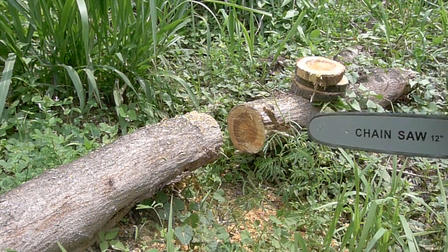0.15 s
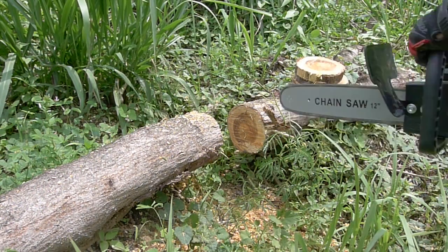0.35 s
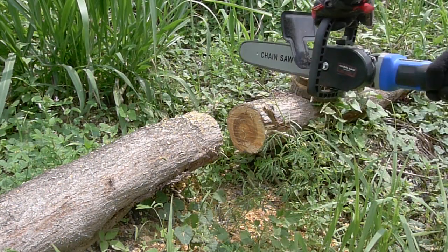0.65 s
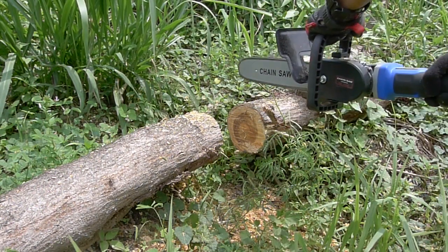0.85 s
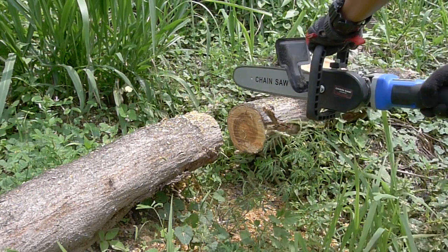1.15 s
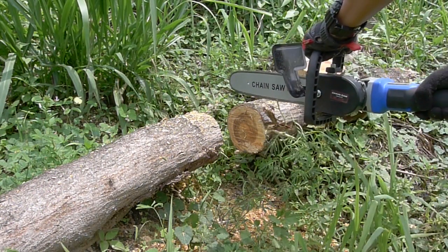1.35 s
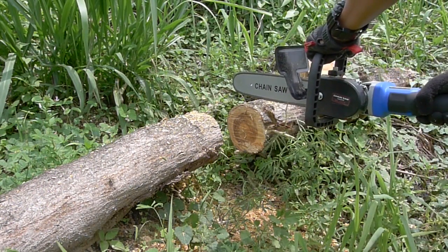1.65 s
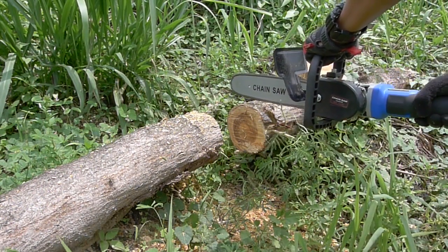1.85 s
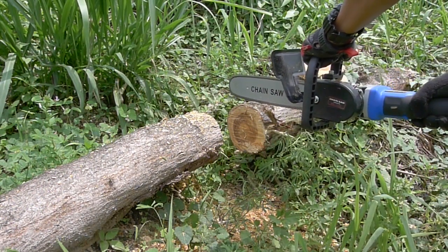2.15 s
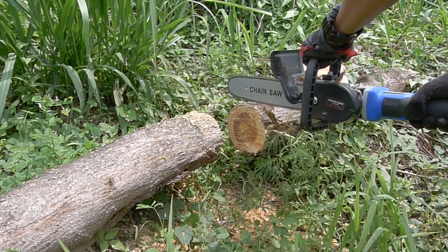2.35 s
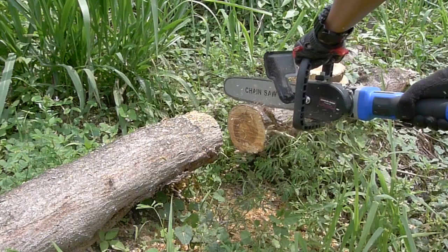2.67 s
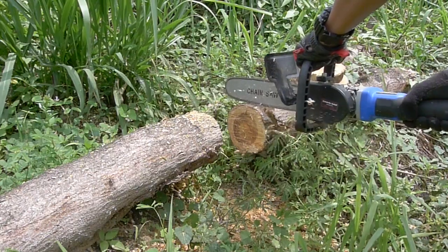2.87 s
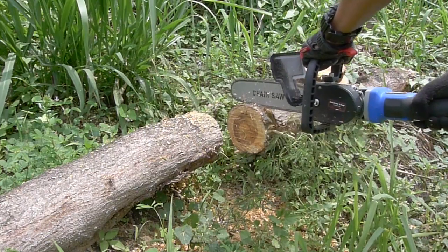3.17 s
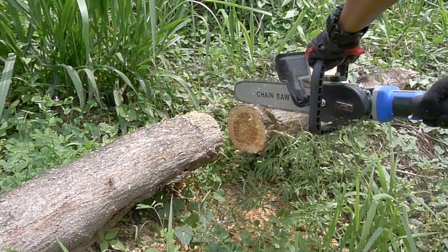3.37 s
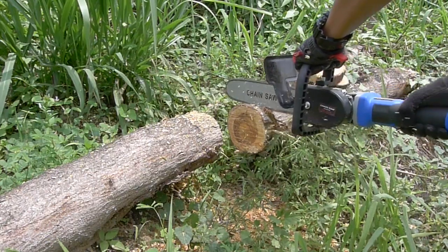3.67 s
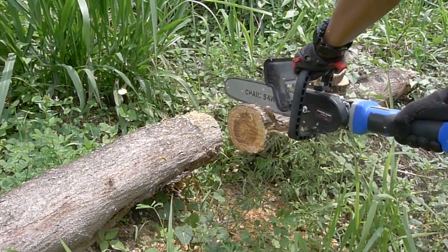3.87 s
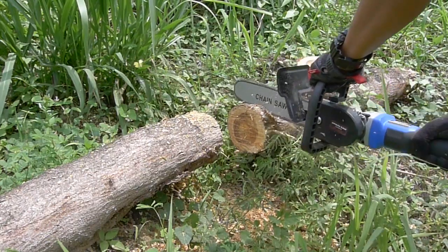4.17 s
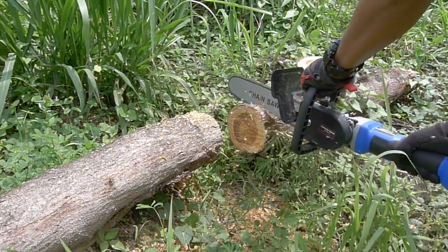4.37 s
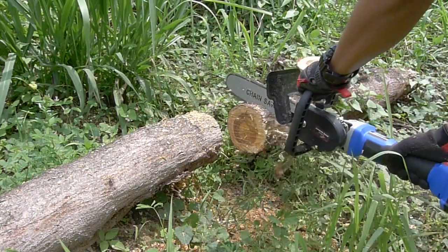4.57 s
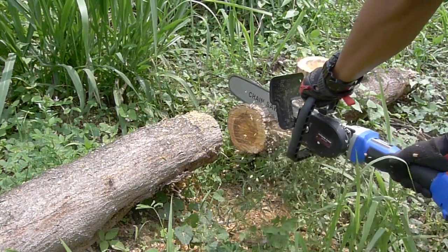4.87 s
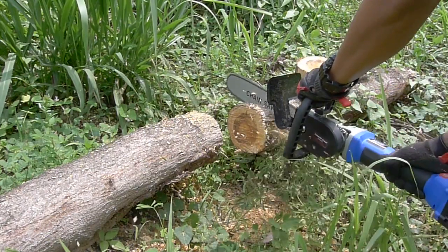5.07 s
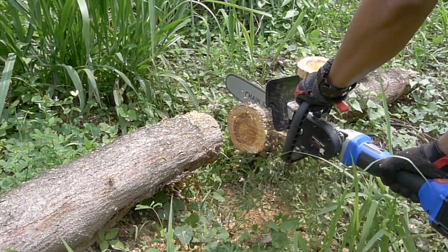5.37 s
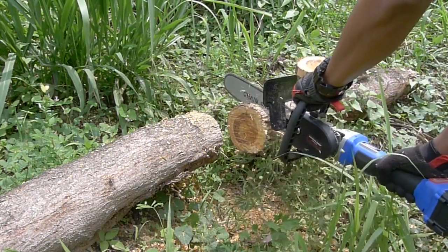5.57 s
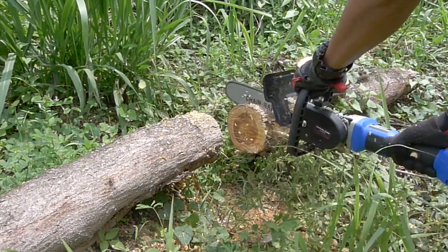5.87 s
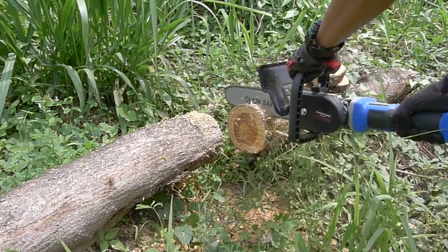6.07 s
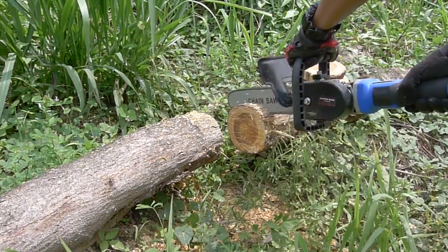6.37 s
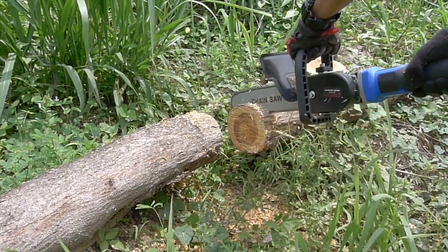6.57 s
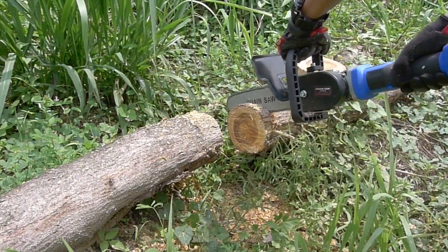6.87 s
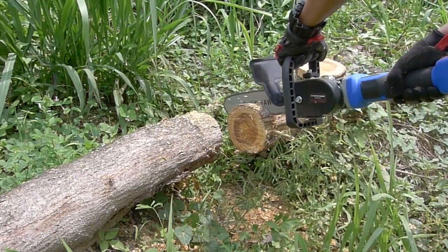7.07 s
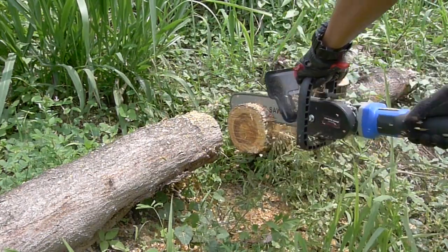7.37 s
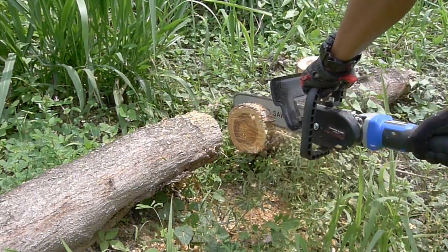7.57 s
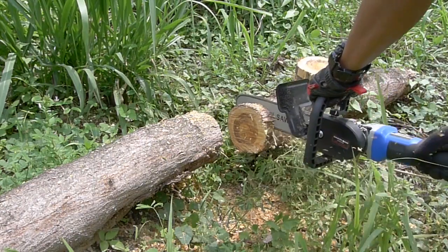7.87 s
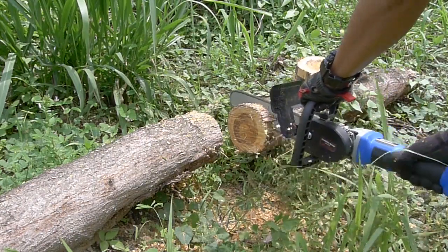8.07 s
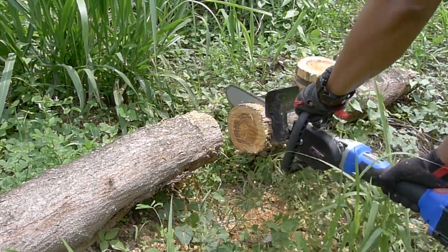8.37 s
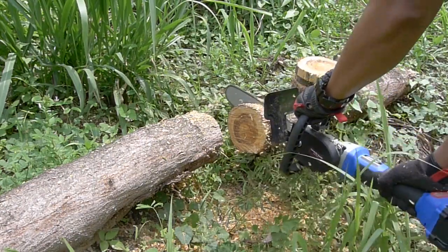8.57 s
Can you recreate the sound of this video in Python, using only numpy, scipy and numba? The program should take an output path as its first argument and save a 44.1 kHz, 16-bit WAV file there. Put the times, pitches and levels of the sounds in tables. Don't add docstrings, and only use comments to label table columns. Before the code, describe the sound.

A small electric chain saw accelerates from a low whirr, clattering loosely, then runs free with a bright metallic hiss. It meets a log and loads down: a piercing high gear whine swells in spells, broken by rapid uneven knocks and rattling metal. Near seven seconds it sags, nearly choked, then picks up again. Mono, fairly close, open air, the saw covering a faint outdoor floor.

```python
import sys
import numpy as np
from scipy import signal
from scipy.fft import rfft, irfft, next_fast_len
from scipy.io import wavfile
from scipy.ndimage import uniform_filter1d
from numba import njit

SR = 44100
rng = np.random.default_rng(int(sys.argv[2]) if len(sys.argv) > 2 else 0)


def generate_wav(signal):
    frames = np.transpose(np.atleast_2d(signal))
    scaled = np.clip(frames, -1, 1) * 32767
    pcm = np.round(scaled).astype(np.int16)
    wavfile.write(sys.argv[1], SR, pcm)


def volts_from_db(level):
    exponent = np.asarray(level, float) / 20
    return 10 ** exponent


N = 384552
TIME = np.arange(N) / SR
TEETH, LINKS_PER_GEAR_CYCLE = 6, .5105
FREE_FROM_S, FREE_FULL_S, LOAD_FROM_S, LOAD_FULL_S = 1.1, 1.7, 2.25, 2.45
BITE_S = 2.3
TOP_HZ = 15730

# time_s, gear_hz
CUT_SPEED = [(2.46, 1349), (2.68, 1267), (3.12, 1245), (3.36, 1277), (3.9, 1152), (4.4, 1217), (4.75, 1155),
             (5.45, 1208), (5.9, 1107), (6.52, 1110), (6.8, 1159), (7.08, 1037), (7.22, 1059), (7.46, 1024),
             (7.76, 1170), (7.97, 1198), (8.341, 1086), (8.72, 1139)]


def speed():
    free_hz, inertia_s = 1522.7, .07
    ramp_hz = np.minimum(519.4 + 670 * TIME - 40 * TIME ** 2, free_hz)
    held_hz = columns([(BITE_S, free_hz)] + CUT_SPEED)[0]
    gear_hz = np.where(TIME < BITE_S, ramp_hz, held_hz)
    return uniform_filter1d(gear_hz, int(inertia_s * SR), mode="nearest")


# first_s, last_s, bounces_count, swell_db
CHATTER = [(0.034, 0.196, 9, 0.5), (0.232, 0.284, 2, 1), (0.314, 0.496, 9, 1.3), (0.592, 1.15, 16, 0.2),
           (1.221, 1.659, 14, 0.35), (1.774, 2.03, 12, 0.5), (2.198, 2.519, 9, 1.4), (2.57, 2.707, 5, 2),
           (2.751, 2.864, 4, 2.5), (2.894, 2.978, 4, 2.3), (3.021, 3.129, 5, 2), (3.15, 3.356, 8, 1.65),
           (3.406, 3.492, 4, 1.7), (3.524, 3.625, 5, 2.5), (3.69, 3.835, 6, 1.85), (3.856, 4.092, 9, 2),
           (4.125, 4.515, 15, 1.66), (4.547, 4.596, 3, 1.5), (4.626, 4.854, 11, 1.35),
           (4.876, 5.077, 8, 2.0), (5.105, 5.359, 11, 2.5), (5.395, 5.637, 10, 2), (5.664, 5.99, 13, 1.5),
           (6.01, 6.588, 23, 1.56), (6.609, 7.092, 19, 1.3), (7.166, 7.424, 12, 1.1), (7.491, 7.569, 5, 2),
           (7.712, 7.989, 13, 2.13), (8.018, 8.24, 10, 1.65), (8.326, 8.694, 15, 1.4)]


def knocks():
    gain, scatter, jitter_s = 1.33, 0.33, 0.0013
    runs = [(s, db) for first, last, count, db in CHATTER for s in np.linspace(first, last, int(round(count)))]
    s, db = np.transpose(runs)
    early_late, soft_hard = rng.standard_normal((len(s), 2)).T
    at = ((s + jitter_s * early_late) * SR).astype(int)
    train = np.zeros(N)
    train[np.clip(at, 0, N - 1)] = gain * db * (1 + scatter * soft_hard)
    return train


# start_s, length_s, rise_s, level_db
SQUEALS = [
    (2.42, 1.23, .06, -30),
    (3.78, 0.22, .1, -38),
    (4.073, 0.63, .2, -36.5),
    (4.9, 0.35, .2, -43),
    (5.95, 0.33, .1, -39),
    (6.653, 0.16, 0.24, -30),
    (7.17, 0.17, .1, -46),
    (7.632, 0.51, 0.22, -33.5),
    (8.35, .5, .3, -39),
]


def squeal():
    spells = sum(volts_from_db(db) * spell(s, length, rise, min(0.29, length / 2)) for s, length, rise, db in SQUEALS)
    return volts_from_db(-47.5) + spells


# pitch_hz, level_db
LINK_TONE = [(264, -76), (390, -56), (500, -51.5), (575, -47.5), (610, -54), (660, -56), (720, -56),
             (775, -47)]
GEAR_TONE = [(517, -45), (640, -44.5), (764, -57), (1014, -46), (1120, -46), (1200, -55), (1330, -57),
             (1520, -49)]
MESH_TONE = [(1000, -25), (2050, -24), (2400, -9), (2600, -1), (2850, -4), (3150, -17), (3700, -27),
             (4300, -63)]
# multiple, level_db
SPROCKET = [(1, -77), (2, -79), (4, -60.5)]


def whine(gear_hz, turns, train):
    load = np.interp(TIME, (LOAD_FROM_S, LOAD_FULL_S), (.2, 1))
    slowing_hz = 11.2 * bounces(train, 0.0053, 0.012)
    wobble = turns + load * (.018 * walk(60) + .04 * walk(18) - np.cumsum(slowing_hz) / SR)
    choke = volts_from_db(load * (1.1 * walk(35) - 2.6 * bounces(train, .004, .008)))

    link = volts_from_db(along(LINKS_PER_GEAR_CYCLE * gear_hz, LINK_TONE) + 1.3 * walk(6) - 5 * (1 - load))
    gear = volts_from_db(along(gear_hz, GEAR_TONE) + 1.2 * walk(6) - 1.9 * (0.5 - load))
    second = volts_from_db(-28.5 + along(2 * gear_hz, MESH_TONE))
    fourth = volts_from_db(-22.5 + along(4 * gear_hz, MESH_TONE))
    fifth = volts_from_db(-31.5 + along(5 * gear_hz, MESH_TONE))
    torque = 0.13 + spell(0, 1.37, .01, .1)
    second = np.where(TIME < BITE_S, second * torque, squeal())

    sizes = link, gear, second, fourth, fifth
    orders = (1, *np.array([1, 2, 4, 5]) / LINKS_PER_GEAR_CYCLE)
    tones = sum(size * np.sin(2 * np.pi * k * wobble) for k, size in zip(orders, sizes))
    free = np.interp(TIME, (FREE_FROM_S, FREE_FULL_S, LOAD_FROM_S, LOAD_FULL_S), (0, 1, 1, 0))
    shaft = sum(volts_from_db(db) * np.sin(2 * np.pi * k * turns / TEETH) for k, db in SPROCKET)
    return np.sqrt(2) * (volts_from_db(0.5) * choke * tones + free * shaft)


def links(turns, scatter_db, slip):
    at = np.flatnonzero(np.diff(np.floor(turns)))
    early_late, soft_hard = rng.standard_normal((len(at), 2)).T
    at_slipped = at + (slip * early_late * np.gradient(at)).astype(int)
    clicks = np.zeros(N)
    clicks[np.clip(at_slipped, 0, N - 1)] = volts_from_db(scatter_db * soft_hard)
    return level(clicks - clicks.mean())


def friction(turns):
    clicks = links(turns, scatter_db=2.0, slip=.22)
    once_a_turn = 1 + 0.15 * np.sin(2 * np.pi * turns / TEETH)
    loose_db = np.interp(TIME, (LOAD_FROM_S, LOAD_FULL_S), (2.2, .9))
    ticks = walk(90)
    slap = volts_from_db(loose_db * (ticks - uniform_filter1d(ticks, SR // 40))) * once_a_turn

    def rub(swell_db, click_db):
        return slap * volts_from_db(swell_db) * (rng.standard_normal(N) + volts_from_db(click_db) * clicks)
    return rub


# pitch_hz, level_db
HISS = [(710, -52), (1200, -10.5), (2010, -8), (2520, -2.5), (3220, -5.5), (4220, -7), (5290, -10.5),
        (6080, -8.5), (7700, -12), (9860, -12), (15600, -14)]
# pitch_hz, width_hz, level_db
PLATES = [(7840, 480, 9), (9800, 890, 9.5), (6000, 230, -36.5)]


def sliding(rub, jolt):
    hiss = volts_from_db(1.0) * colour(rub(1.42 * jolt, -11.5), HISS)
    plates = volts_from_db(-10.0 + 1.4 * walk(2.95)) * ring(rub(1.3 * jolt, -15), PLATES)
    return hiss + plates


def drive_bands(rub, jolt, links_hz, depth):
    cutting_db = np.interp(TIME, (BITE_S, BITE_S + .3), (-28, 0))
    drag = rub(1.0 * jolt, -40)
    upper = volts_from_db(buried(depth, -12.5, -5.5) + cutting_db) * smear(drag, 6.95 * links_hz, 900.)
    pair = smear(drag, 3.92 * links_hz, 140.) + volts_from_db(-6) * smear(drag, 4.9 * links_hz, 250.)
    lower = volts_from_db(-14.5 + cutting_db) * pair
    ridge = volts_from_db(-13) * spell(7.33, 0.4, .15, .08) * smear(drag, 6.85 * links_hz, 220.)
    blades_per_gear_cycle = 13.2
    fan_hz = np.minimum(blades_per_gear_cycle / LINKS_PER_GEAR_CYCLE * links_hz, TOP_HZ)
    fan = volts_from_db(-9.5) * spell(-1, 1.45, .1, 0.18) * smear(drag, fan_hz, 2600.0)
    return fan + upper + ridge + lower


# pitch_hz, width_hz, level_db
BLADE = [(7300, 120, 3), (4200, 60, -8), (5980, 35, -2), (7940, 30, -8), (6130, 60, -4), (9230, 60, -9),
         (9980, 40, -9), (10470, 50, -10)]


def blade_face(rub, jolt, face_db):
    return volts_from_db(-10.5 + face_db + 2.0 * walk(7)) * ring(rub(0.54 * jolt, -13), BLADE)


# pitch_hz, width_hz, level_db
HOUSING = [(2412, 99, 7.5), (2776, 320, 6.5), (3040, 230, -0.5), (3400, 44, -6.5), (2230, 210, -31)]


def housing_rattle(rub, jolt, depth):
    housing_db = buried(depth, -4.5, -8.5) - squeal() / volts_from_db(-27)
    return volts_from_db(housing_db) * ring(rub(1.3 * jolt, -10.0), HOUSING)


# pitch_hz, width_hz, level_db
COVER = [(1596, 100, 0), (980, 120, -4)]


def cover_slap(rub, thud):
    slack = np.interp(TIME, (0, 0.27, 0.4, 1.5), (.45, 0.82, 0.47, 0.018))
    return volts_from_db(-4.5) * slack * ring(rub(2.6 * thud, -6), COVER)


# pitch_hz, width_hz, level_db
BAR = [(622.4, 82, 1), (1103, 178, -0.5), (778, 223, -1.5), (1486, 440, -3.5), (1837, 225, 0.5)]


def bar_knock(rub, thud, depth):
    return volts_from_db(buried(depth, -13.5, -7.5)) * ring(rub(3.6 * thud, -9.5), BAR)


# pitch_hz, width_hz, level_db
LOG = [(216.7, 14, 0.5), (303, 73, 1), (157, 35, -1.5)]


def log_knock(rub, thud, depth):
    body = ring(rub(3.1 * thud, -13.0), LOG)
    return volts_from_db(buried(depth, -40, -22)) * ring(body, [(260, 220, 0)])


# time_s, chain_hiss_db, body_coupling_0_to_1 (high at the starting jerk, then depth in the
# wood), face_to_camera_db
HOLD = [(0, -28.5, 0.63, 3.5), (.7, -27, 0.03, 0), (1.4, -28.5, 0.06, 1), (2.3, -28.5, .2, 3.5),
        (2.9, -28.5, 0.63, -3.5), (3.9, -29.5, 0.68, 3.5), (4.5, -30, 0.83, -3), (5.3, -29.5, 0.81, -1.5),
        (6.6, -28.5, 0.81, 2), (7.1, -28.5, 0.92, 0.5), (7.5, -28, 0.93, 0.5), (7.9, -29, .8, -3),
        (8.72, -27, .9, 3)]


def chain(links_hz, turns, train):
    hiss_db, depth, face_db = columns(HOLD)
    rub = friction(turns)
    jolt = bounces(train, .004, 0)
    thud = 3 * np.tanh(bounces(train, .0035, -.001) / 3)
    metal = sliding(rub, jolt) + drive_bands(rub, jolt, links_hz, depth)
    metal += blade_face(rub, jolt, face_db) + housing_rattle(rub, jolt, depth)
    blows = cover_slap(rub, thud) + bar_knock(rub, thud, depth) + log_knock(rub, thud, depth)
    return volts_from_db(hiss_db) * (metal + blows)


# pitch_hz, level_db
FIELD = [(15, -48), (25, -18), (70, -13), (144, -18), (188, -19), (349, -17), (450, -4), (580, -30),
         (990, -120)]


def field():
    breeze = colour(rng.standard_normal(N), [(20, -7), (45, -8), (95, -1.5), (140, -16), (300, -50)])
    lull_db = np.interp(TIME, (1.1, 2.0, 2.6), (0, -7, 0))
    first_gust = volts_from_db(-67) * np.exp(-(TIME / .9) ** 2)
    gusts = volts_from_db(1.2 * walk(2.9)) * (volts_from_db(-72.5 + lull_db) + first_gust)
    return volts_from_db(-73) * colour(rng.standard_normal(N), FIELD) + gusts * breeze


def bounces(train, width_s, late_s):
    t = TIME[:SR // 10] - .05 - late_s
    shape = np.exp(-.5 * (t / width_s / np.where(t < 0, .7, 1.3)) ** 2)
    swell = signal.fftconvolve(train, shape, "same")
    return swell - uniform_filter1d(swell, SR // 5)


def buried(depth, clear_db, buried_db):
    return clear_db + (buried_db - clear_db) * depth


def ring(x, modes):
    body = 0
    for k, (hz, width, db) in enumerate(modes):
        body = body + (-1) ** k * volts_from_db(db) * signal.lfilter(*signal.iirpeak(hz, hz / width, SR), x)
    return level(body)


def smear(x, hz, width):
    return level(svf(svf(x, hz, width), hz, width))


@njit
def svf(x, hz, width):
    y, band, low = np.empty(len(x)), 0., 0.
    for i in range(len(x)):
        g, k = np.tan(np.pi * hz[i] / SR), width / hz[i]
        v = (band + g * (x[i] - low)) / (1 + g * (g + k))
        band, low, y[i] = 2 * v - band, low + 2 * g * v, k * v
    return y


def colour(x, points):
    hz, db = np.transpose(points)
    size = next_fast_len(N)
    log_hz = np.log(np.arange(size // 2 + 1) * SR / size + 1)
    gain = volts_from_db(np.interp(log_hz, np.log(hz), db))
    return level(irfft(rfft(x, size) * gain, size)[:N])


def along(hz, points):
    at, db = np.transpose(points)
    return np.interp(np.log(hz), np.log(at), db)


def walk(rate):
    k = int(SR / rate)
    held = np.repeat(rng.standard_normal(N // k + 1), k)
    return level(uniform_filter1d(uniform_filter1d(held, k), k)[:N])


def spell(start_s, length_s, rise_s, fall_s):
    rise = (TIME - start_s) / rise_s
    fall = (start_s + length_s - TIME) / fall_s
    return np.clip(np.minimum(rise, fall) + .5, 0, 1) ** 2


def columns(table):
    s, *rest = np.transpose(table)
    return [np.interp(TIME, s, c) for c in rest]


def level(x):
    return x / np.sqrt(np.mean(x ** 2))


def scene():
    gear_hz, train = speed(), knocks()
    links_hz = LINKS_PER_GEAR_CYCLE * gear_hz
    turns = np.cumsum(links_hz) / SR
    mono = whine(gear_hz, turns, train) + chain(links_hz, turns, train) + field()
    return np.array([mono, mono])


def low_pass(x):
    return signal.sosfilt(signal.butter(12, 16920, fs=SR, output="sos"), x)


def record(dry):
    notch_hz, notch_width_hz, ceiling = 7460, 260, .45
    notched = signal.lfilter(*signal.iirnotch(notch_hz, notch_hz / notch_width_hz, SR), dry)
    wet = notched + volts_from_db(-22) * dry
    wet = signal.sosfilt(signal.butter(2, 36, "high", fs=SR, output="sos"), wet)
    wet = ceiling * np.tanh(wet / ceiling)
    wet = signal.sosfilt(signal.ellip(12, .3, 80, TOP_HZ, fs=SR, output="sos"), wet)
    return low_pass(wet)


dry = scene()
out = record(dry)
generate_wav(out)
```